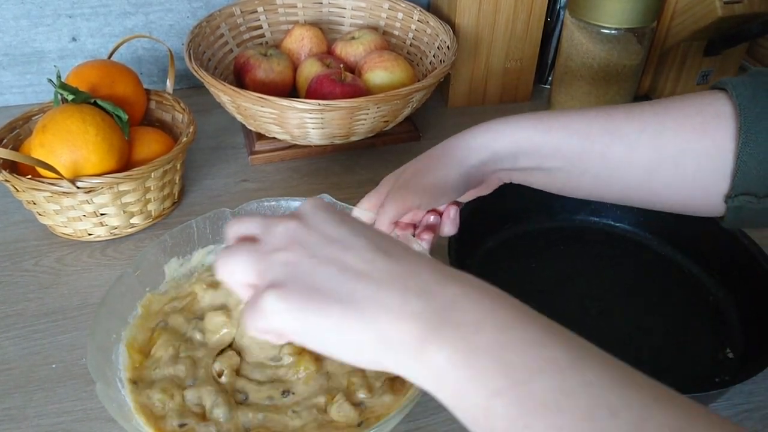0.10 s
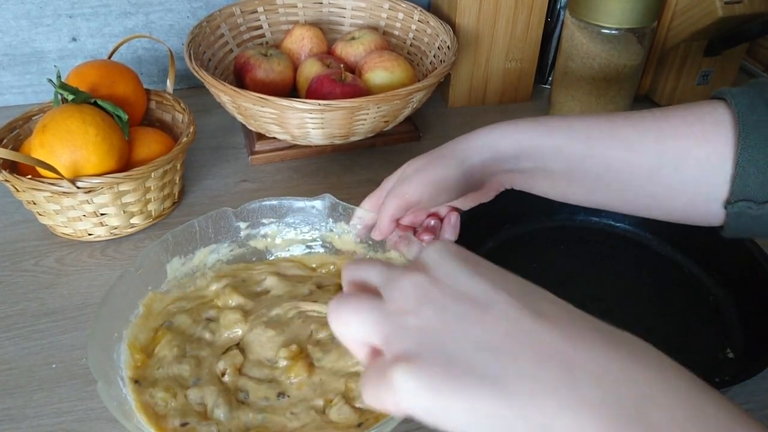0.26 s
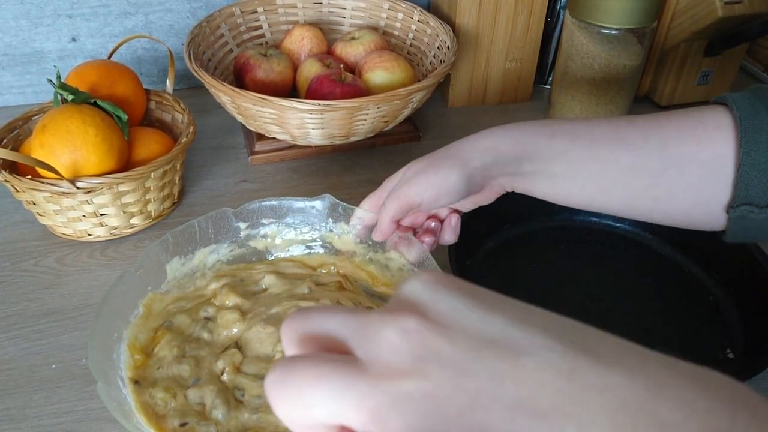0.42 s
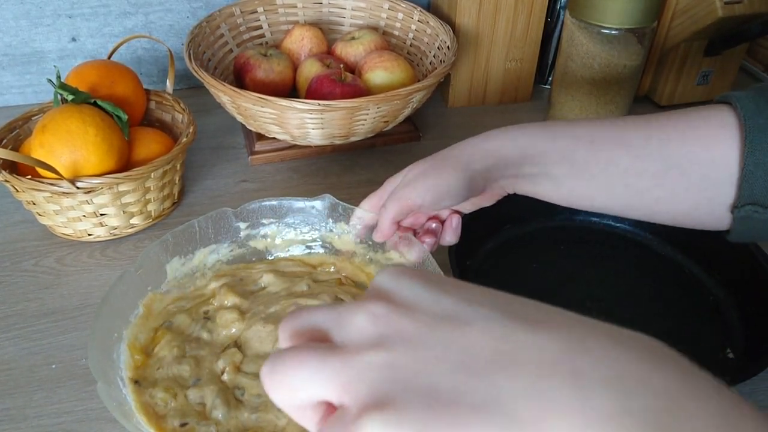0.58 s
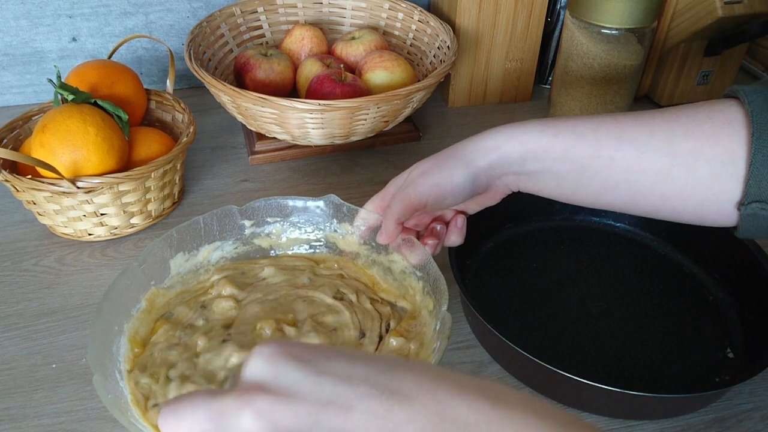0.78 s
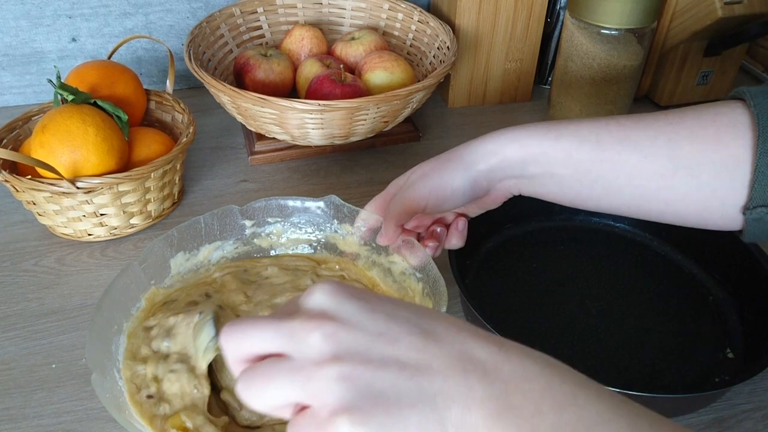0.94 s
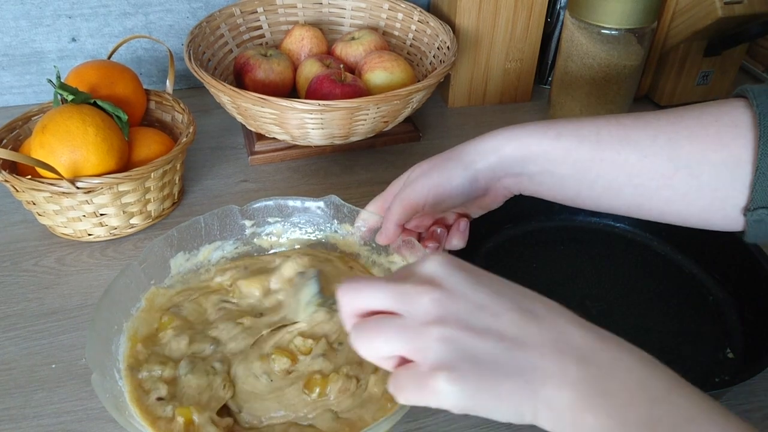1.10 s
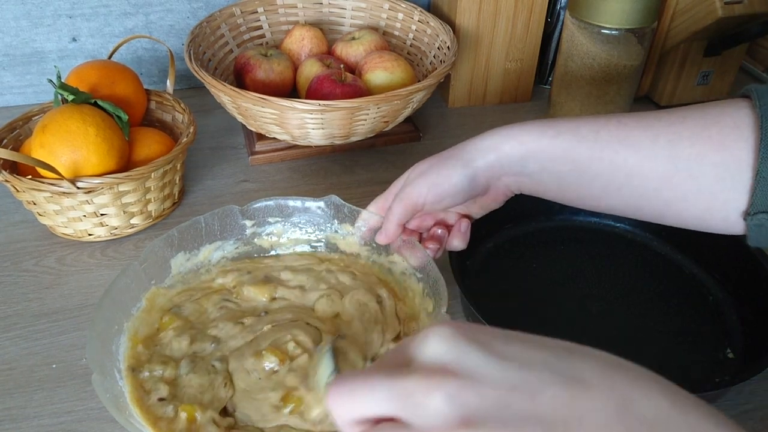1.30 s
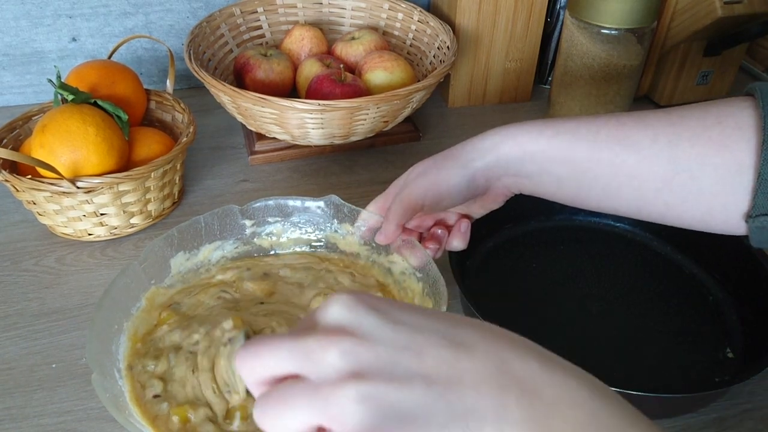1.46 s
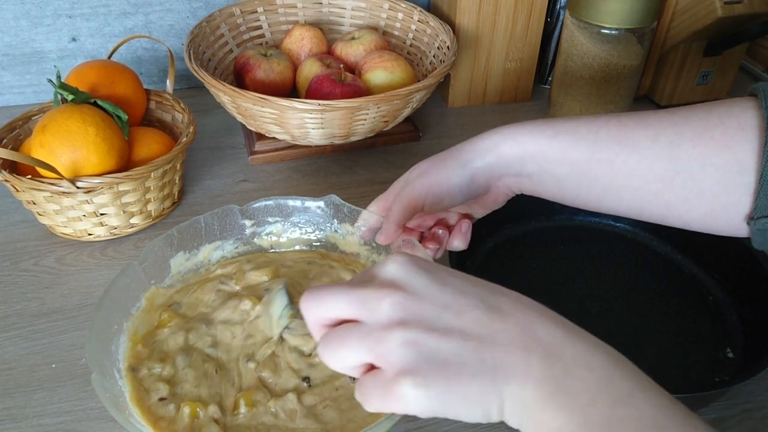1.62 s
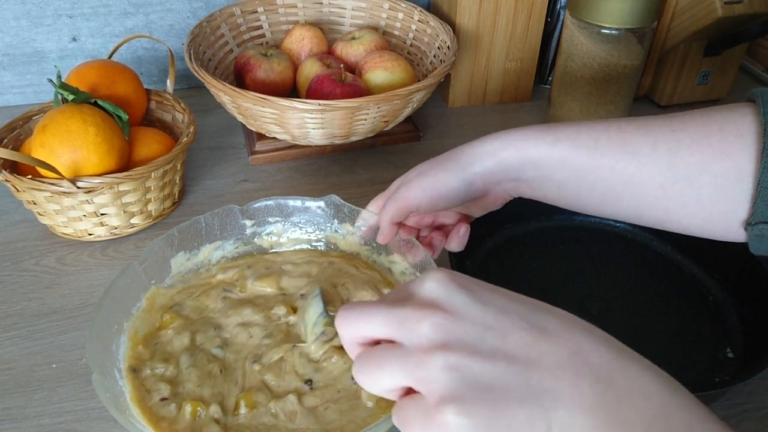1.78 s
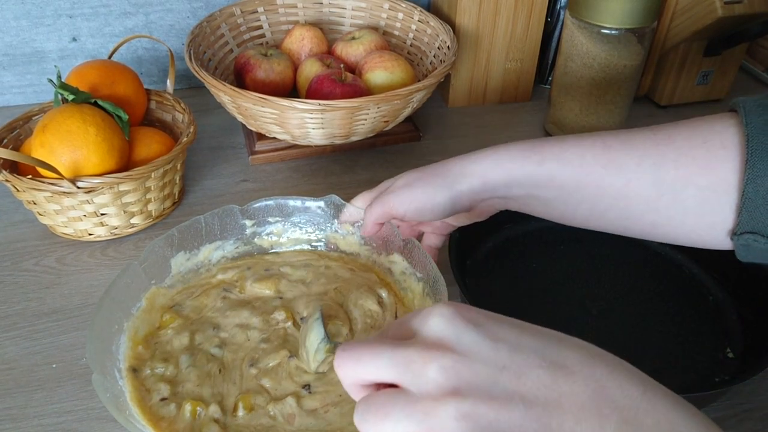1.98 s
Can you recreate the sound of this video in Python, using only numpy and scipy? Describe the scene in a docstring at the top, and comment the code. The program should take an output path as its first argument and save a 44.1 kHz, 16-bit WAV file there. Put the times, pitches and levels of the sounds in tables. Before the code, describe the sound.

One sharp, quickly damped clack of a spoon on a batter-filled glass bowl, then near silence.

```python
"""A spoon stirs thick batter in a glass bowl on a kitchen counter, over appliance hum and a quiet floor.
The bowl is nudged softly; then one hard knock, four quick contacts, excites its decaying modes with a
bright noise crack. The batter chokes the ring at once; the counter swells late, a baking tin rings along
and diffuse noise echoes of the bare room carry the tail. Further soft nudges follow, among sticky ticks
of the batter made of short narrow-band noise bursts."""
import sys
import numpy as np
from scipy import signal
from scipy.io import wavfile

SR = 44100
rng = np.random.default_rng(int(sys.argv[2]) if len(sys.argv) > 2 else 0)


def unload_audio(sound):
    """Save the sound as a 16-bit wav file, at the path given as the first command line argument."""
    columns = np.transpose(np.atleast_2d(sound))
    # keep every value between -1 and 1, then stretch to whole-number steps
    steps = np.round(np.clip(columns, -1, 1) * 32767)
    wavfile.write(sys.argv[1], SR, steps.astype(np.int16))


def invert_db(x):
    """Field ratio 10**(x/20) for x, a level in decibels (scalar or array-like)."""
    u = np.asarray(x, float) / 20
    return 10 ** u


N = 90404

# the knock, spoon edge meeting the glass: t/s, impulse level/dB, softness as cut-off f/Hz
CONTACTS = [(.2451, -15.5, 9010), (.2460, -24.5, 6090), (.2479, -23.5, 4035), (.2501, -30.5, 890)]
# the spoon nudges the bowl through the batter: t/s, impulse level/dB, softness as cut-off f/Hz
NUDGES = [(.030, -43.5, 505), (.70, -49.5, 496), (.80, -46, 496), (1.98, -50, 500), (2.01, -45.5, 496)]
# each bowl mode as the walls hear it, against the near sound: level/dB
TOWARDS_ROOM = [-1, 1.5, 3.5, 2, -5, -2, 0, -1.5, -4, -2, -3.5, -10, -0.5, -9.5, -2, 3.5, 10, -5.5]
# averaged over all directions the modes blur: share of their t60
ROOM_RING_SHARE = 0.52
RIGHT_LAG_S = 0.00013


def bowl():
    """Modal superposition and directivity: knock, crack and nudges, as heard near and as sent to the walls."""
    t = np.arange(N) / SR
    choke = grip()
    edge = crack()
    near_offsets = np.zeros(len(MODES))
    near = strike(CONTACTS, near_offsets, 1) * choke + strike(NUDGES, near_offsets, 1) + edge
    far_knock = strike(CONTACTS, TOWARDS_ROOM, ROOM_RING_SHARE) * choke
    far = far_knock + strike(NUDGES, TOWARDS_ROOM, ROOM_RING_SHARE) + edge
    near[1] = np.interp(t - RIGHT_LAG_S, t, near[1])
    return near, far


# bowl on the counter, ring per unit click: f/Hz, left level/dB, right level/dB, t60/s
MODES = [(445.4, -9.5, -4.5, .05), (667, -19, -16, 0.035), (888, -19, -15.5, 0.047),
         (1136, -20, -16, 0.033), (1314, -9, -5, 0.024), (1660, -3.5, -6, 0.026), (2050, -22.5, -12, 0.013),
         (2386, -14, -6.5, .018), (2810, -10, -10.5, 0.019), (3500, -16.5, -11.5, 0.021),
         (3837.6, -23, -7.5, 0.026), (4650, -12, -7.5, 0.016), (5110, -18.5, -17, 0.027),
         (6110, -12, -15, 0.01022), (7260, -21.5, -19, 0.039), (8060, -24.5, -11.5, 0.0068),
         (9100, -29.5, -23.5, 0.008), (13600, -29, -34.5, .004)]


def strike(hits, extra_db, share):
    """Modal excitation: one force sets every mode ringing, neighbours in opposite phase."""
    force = no_bass(push(hits))
    out = np.zeros((2, N))
    for k, (hz, left_db, right_db, t60) in enumerate(MODES):
        gain = invert_db(np.array([[left_db], [right_db]]) + extra_db[k])
        out += (-1) ** k * ring(force, hz, share * t60) * gain
    return out


def push(hits):
    """Contact mechanics: a soft contact spreads its impulse in time and so loses treble."""
    out, t = np.zeros(N), np.arange(N) / SR
    for s, db, hz in hits:
        u = np.maximum(t - s, 0) * 2 * np.pi * hz
        pulse = u * np.exp(-u)
        out += invert_db(db) * pulse / pulse.sum()
    return out


def no_bass(x):
    """Radiation efficiency: a small bowl radiates little bass, hence a steep high-pass."""
    return signal.sosfilt(signal.butter(3, 272, "high", fs=SR, output="sos"), x)


def ring(clicks, hz, t60):
    """Damped resonance: a unit click starts a decaying sine of height 1 in a two-pole filter."""
    radius = invert_db(-60 / (max(t60, 0.002) * SR))
    w = 2 * np.pi * hz / SR
    # the tiny offset keeps the filter clear of vanishing numbers
    return signal.lfilter([0, np.sin(w)], [1, -2 * radius * np.cos(w), radius ** 2], clicks + 1e-18)


GRIP_S, GRIP_DB, GRIP_FADE_S = 0.2528, -6.5, 0.00063


def grip():
    """Added damping: the batter closes on the spoon and chokes the ring by a quick drop in gain."""
    t = np.arange(N) / SR
    return invert_db(GRIP_DB * np.clip((t - GRIP_S) / GRIP_FADE_S, 0, 1))


CRACK_DB, CRACK_T60_S = -41.5, 0.00755   # level before the band-pass
CRACK_BAND_HZ = [5030, 15000]


def crack():
    """Impact noise: the first contact has a bright edge, a decaying noise band independent in each ear."""
    since = since_knock()
    envelope = (since > 0) * invert_db(CRACK_DB - 60 * np.clip(since, 0, 1) / CRACK_T60_S)
    noise = rng.standard_normal((2, N)) * envelope
    return signal.sosfilt(signal.butter(1, CRACK_BAND_HZ, "band", fs=SR, output="sos"), noise)


SCATTER_DB = 8


def blow():
    """Scattering: the first contact itself reaches the room by other paths than the ring."""
    pulse = invert_db(SCATTER_DB) * no_bass(push(CONTACTS[:1]))
    return np.stack([pulse, pulse])


# the counter's late, weak thump: f/Hz, level before the swell/dB, t60/s
COUNTER = [(74, -59.5, 0.13), (118, -63, .12), (200, -67, 0.26), (293.3, -38.5, 0.079)]


def counter():
    """Structure-borne sound: the knock excites low modes of the counter."""
    return shaken(COUNTER)


# the baking tin beside the bowl: f/Hz, level before swell and waver/dB, t60/s
TIN = [(468, -49.5, 0.57), (2465, -59.5, 0.89), (5804, -80, 0.87)]
TIN_WAVER_DB, TIN_WAVER_HZ = 4.5, 8.27


def tin():
    """Sympathetic vibration: each mode of the tin rings along with its own unsteady level."""
    return sum(shaken([mode]) * invert_db(TIN_WAVER_DB * drift(TIN_WAVER_HZ)) for mode in TIN)


def shaken(modes):
    """Gradual energy transfer: modes swell for some milliseconds after the knock, then decay."""
    u = np.maximum(since_knock(), 0)
    swell = 1 - np.exp(-2 * np.pi * 30.26 * u)   # rise rate as a cut-off of 30.26 Hz
    out = np.zeros(N)
    for hz, db, t60 in modes:
        out += swell * invert_db(db - 60 * u / t60) * np.sin(2 * np.pi * hz * u)
    return out


# sticky ticks: t/s, level before rise and decay/dB, f/Hz, left minus right level/dB, t60/s
TICKS = [(.811, -69, 7700, -9, 0.0327), (0.831, -70, 4960, 0, 0.016), (1.084, -67, 3500, -1, 0.0093),
         (1.221, -62, 5020, 5, 0.0086), (1.221, -69.5, 6800, 0.5, 0.011), (1.226, -63, 1380, -9, 0.012),
         (1.404, -69, 7850, -7, 0.017), (1.429, -74.5, 1380, -14, 0.11), (1.503, -69, 7400, -4.5, 0.011),
         (1.594, -74.5, 5170, -0.5, 0.017), (1.786, -69.5, 1592, -9, 0.058), (1.88, -77.5, 2715, -5, 0.26),
         (1.925, -76.5, 1700, 5, 0.11), (1.991, -76, 2450, -4, 0.14)]
# band width as a share of the pitch; rise time as a share of t60
TICK_WIDTH, TICK_RISE = 0.19, 0.097


def batter():
    """Band-limited transients: each tick is a short noise burst in a band around its pitch."""
    out, t = np.zeros((2, N)), np.arange(4000) / SR
    for s, db, hz, pan_db, t60 in TICKS:
        band = [hz * (1 - TICK_WIDTH / 2), hz * (1 + TICK_WIDTH / 2)]
        sos = signal.butter(2, band, "band", fs=SR, output="sos")
        noise = rms_one(signal.sosfilt(sos, rng.standard_normal(len(t))))
        rise = np.minimum(t / (TICK_RISE * t60), 1)
        burst = noise * invert_db(db - 60 * t / t60) * rise
        i = int(s * SR)
        out[:, i:i + len(t)] += (burst * invert_db(balance(pan_db)))[:, :N - i]
    return out


# reverberation time: f/Hz, t60/s
ROOM_T60 = [(100, 0.45), (300, 0.5), (1000, 0.74), (3000, 0.73), (7000, 0.655), (12000, 0.28)]
# colour of the echoes: f/Hz, relative level/dB
ROOM_COLOUR = [(100, 8), (300, 3.5), (450, -1), (650, 2.5), (1000, 2.5), (1500, 1), (2000, -3), (2500, 2),
               (4000, 1), (7000, -0.5), (9000, -12), (11000, -18), (15000, -20)]
# balance of the echoes: f/Hz, left minus right level/dB
ROOM_BALANCE = [(60, -8.5), (180, -8.5), (550, -4), (1650, -5.5), (4970, -4.5), (15000, 6)]
# left-right likeness of the echoes: f/Hz, correlation
ROOM_LIKENESS = [(100, 0.91), (400, 0.64), (1000, 0.09), (2500, 0.15), (10000, 0)]
ROOM_DB, ROOM_ONSET_S = -44.5, 0.00552


def room(x):
    """Diffuse reverberation: convolution with noise that dies band by band, partly shared by the ears."""
    t, tail = np.arange(SR) / SR, 0
    white = rng.standard_normal((2, 2, SR))
    for k, (hz, sos) in enumerate(bands()):
        mid, side = signal.sosfilt(sos, white[k % 2])   # neighbouring bands use separate noise
        fall_db = 60 * t / at_hz(ROOM_T60, hz)
        gain = invert_db(at_hz(ROOM_COLOUR, hz) - fall_db + balance(at_hz(ROOM_BALANCE, hz)))
        tail = tail + gain * two_ears(mid, side, at_hz(ROOM_LIKENESS, hz))
    # silent for half the onset time, then a rise lasting one onset time
    tail *= invert_db(ROOM_DB) * np.clip(t / ROOM_ONSET_S - 0.5, 0, 1)
    return signal.fftconvolve(x[:1] + x[1:], tail, axes=1)[:, :N]


# appliance hum, shifting as the arm moves by; rms levels at mid-time, before the waver:
# f/Hz, left level/dB, right level/dB, left slope/(dB/s), right slope/(dB/s)
HUM = [(122, -82, -84, -5, 0), (168.5, -82.5, -87.5, -3, -2), (186.8, -75.5, -80, -3.5, -3),
       (235.6, -77.5, -79, -0.5, -6), (247.5, -78.5, -77, 1.5, 1.5), (279.6, -78, -81, -3, -4),
       (372.7, -80, -87, 3.5, -12.5), (449, -93, -79.5, -12.5, 10.5), (494, -79.5, -83.5, -3, -4.5),
       (691, -86, -91.5, -4.5, -1.5), (721, -88, -87, -1, -7.5)]
HUM_WAVER_DB, HUM_WAVER_HZ = 1.5, 3.0


def hum():
    """Line spectrum: sines of fixed pitch whose levels drift apart in the two ears."""
    t, out = np.arange(N) / SR, 0
    for hz, left_db, right_db, left_slope, right_slope in HUM:
        level = np.array([[left_db], [right_db]]) + np.array([[left_slope], [right_slope]]) * (t - t.mean())
        level = level + HUM_WAVER_DB * np.array([drift(HUM_WAVER_HZ), drift(HUM_WAVER_HZ)])
        # phase in turns, slightly different in each ear
        phase = rng.random() + 0.12 * rng.standard_normal((2, 1))
        out = out + np.sqrt(2) * invert_db(level) * np.sin(2 * np.pi * (hz * t + phase))
    return out


# spectrum of room air and microphone hiss: f/Hz, relative level per Hz/dB
FLOOR = [(15, -50), (25, -33.5), (45, -16), (80, -5.5), (140, -7), (250, -12.5), (330, -7), (470, -8.5),
         (640, -12.5), (890, -13.5), (2000, -21), (6210, -29), (9000, -33), (12900, -32.5), (16000, -32)]
# course of the whole floor: t/s, level/dB
FLOOR_LEVEL = [(0, -68), (.3, -69), (.8, -68.5), (1.3, -69.5), (2.05, -70.5)]
# balance of the floor: f/Hz, left minus right level/dB
FLOOR_BALANCE = [(60, -10), (180, 0), (550, -1), (1650, -4), (4970, -1.5), (15000, 1.5)]
# left-right likeness of the floor: f/Hz, correlation
FLOOR_LIKENESS = [(60, 0.28), (300, 0), (700, 0), (15000, 0)]


def floor(patchy_db):
    """Broadband noise: bands each with a level, balance, likeness and slight flicker."""
    out, white = 0, rng.standard_normal((2, 2, N + 8000))
    for k, (hz, sos) in enumerate(bands()):
        mid, side = signal.sosfilt(sos, white[k % 2])[:, 8000:]   # skip the filter's start
        flicker_db = patchy_db * drift(5.0)
        gain = invert_db(at_hz(FLOOR, hz) + flicker_db + balance(at_hz(FLOOR_BALANCE, hz)))
        out = out + gain * two_ears(mid, side, at_hz(FLOOR_LIKENESS, hz))
    s, db = np.transpose(FLOOR_LEVEL)
    return rms_one(out) * invert_db(np.interp(np.arange(N) / SR, s, db))


def bands():
    """Half-octave analysis: band-pass filters with their geometric centres in Hz."""
    edges = 22 * 2 ** np.arange(0, 9.6, 0.5)
    return [(np.sqrt(low * high), signal.butter(2, [low, high], "band", fs=SR, output="sos"))
            for low, high in zip(edges, edges[1:])]


def two_ears(mid, side, likeness):
    """Interaural correlation: shared and opposed noise mixed to the wanted likeness."""
    alike = np.clip(likeness, -1, 1)
    return np.sqrt(1 + alike) * mid + np.sqrt(1 - alike) * side * [[1], [-1]]


def balance(db):
    """Level difference between the ears, split evenly in dB."""
    return np.array([[db / 2], [-db / 2]])


def at_hz(points, hz):
    """Logarithmic pitch scale: reads a table between its rows along log frequency."""
    f, value = np.transpose(points)
    return np.interp(np.log(hz), np.log(f), value)


def drift(rate):
    """Low-passed noise: a slow random course of spread 1, with its cut-off at rate in Hz."""
    step = 40   # samples between drawn points
    r = np.exp(-2 * np.pi * step * rate / SR)
    slow = signal.lfilter([1], [1, -2 * r, r * r], rng.standard_normal(N // step + 2002))[2000:]
    return np.interp(np.arange(N) / step, np.arange(len(slow)), rms_one(slow - slow.mean()))


def rms_one(x):
    """Effective value: scales a signal to rms 1."""
    return x / np.sqrt(np.mean(x ** 2) + 1e-20)


def since_knock():
    """Time origin at the first contact, in seconds."""
    return np.arange(N) / SR - CONTACTS[0][0]


def scene():
    """Superposition: direct sound and its reverberation over hum and floor."""
    near, far = bowl()
    rest = batter() + counter() + tin()
    echoes = room(far + rest) + room(blow())
    return near + rest + echoes + hum() + floor(patchy_db=1.3)


def band_limit(x):
    """A steep low-pass at the top of the band."""
    return signal.sosfilt(signal.butter(12, 16400, fs=SR, output="sos"), x)


def record(dry):
    """Final stage: hands on the finished mix."""
    return band_limit(dry)


dry = scene()
out = record(dry)
unload_audio(out)
```